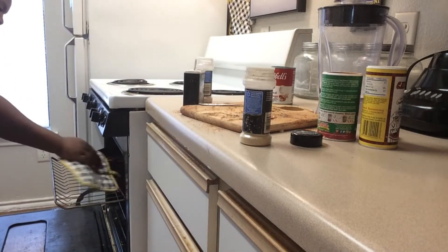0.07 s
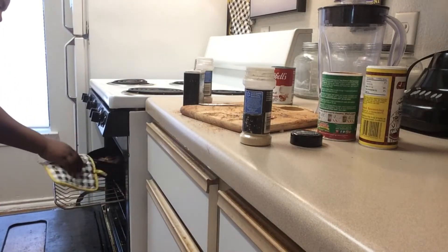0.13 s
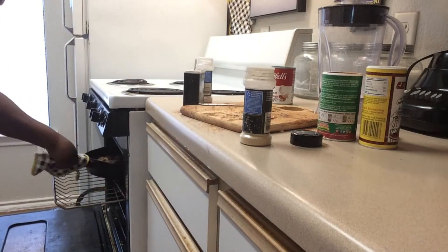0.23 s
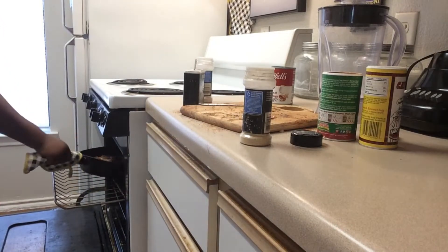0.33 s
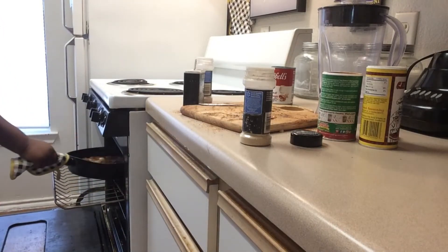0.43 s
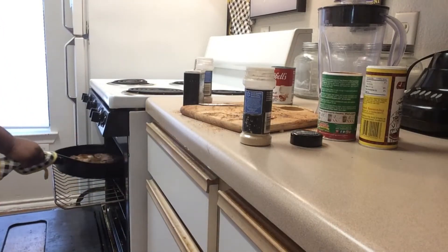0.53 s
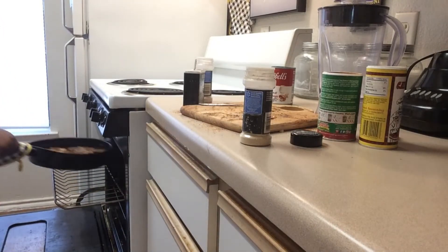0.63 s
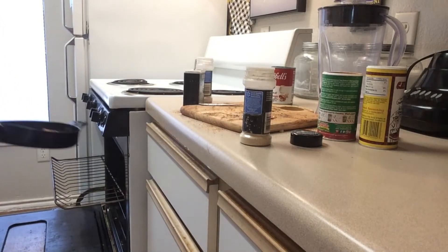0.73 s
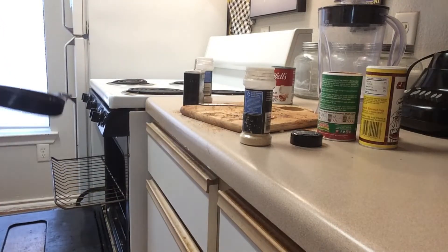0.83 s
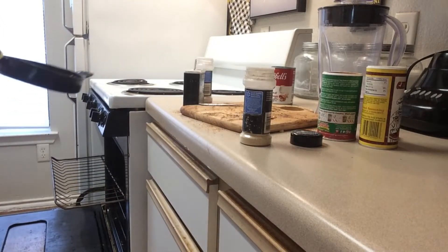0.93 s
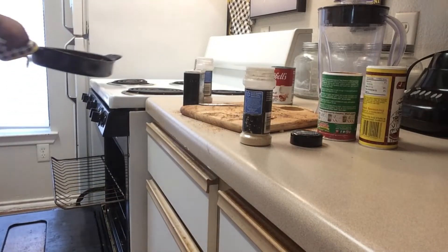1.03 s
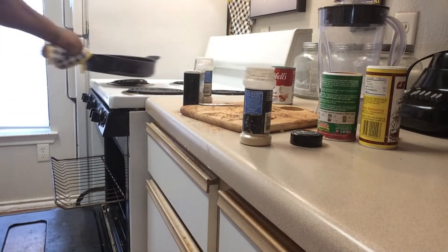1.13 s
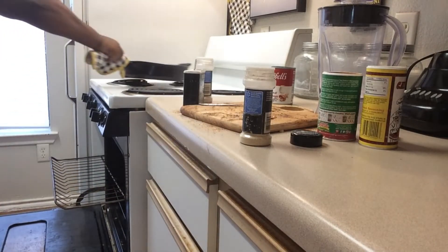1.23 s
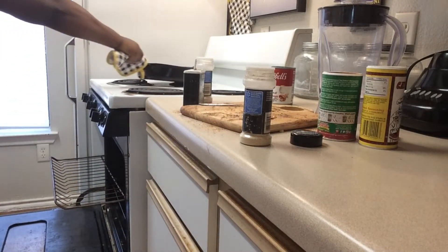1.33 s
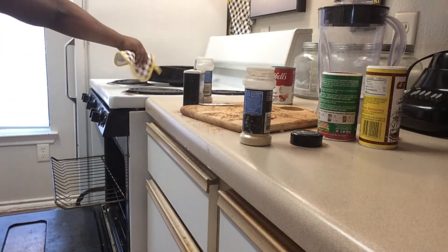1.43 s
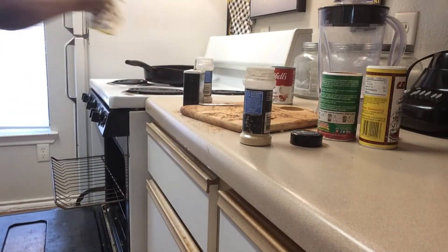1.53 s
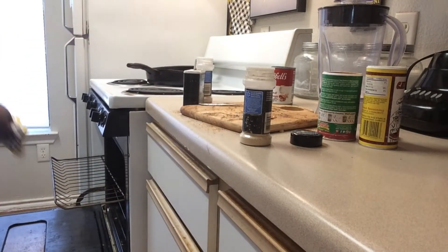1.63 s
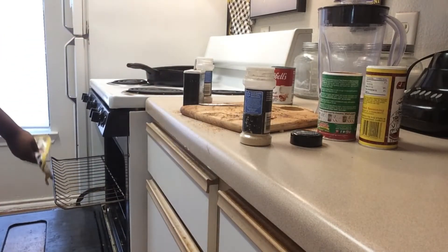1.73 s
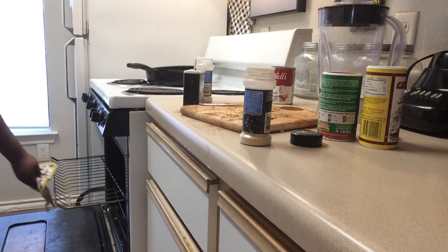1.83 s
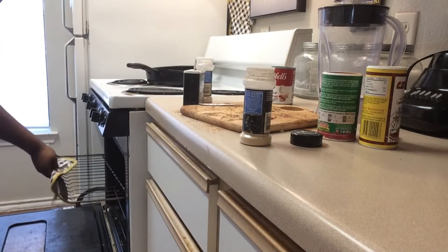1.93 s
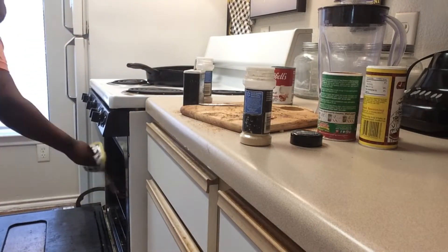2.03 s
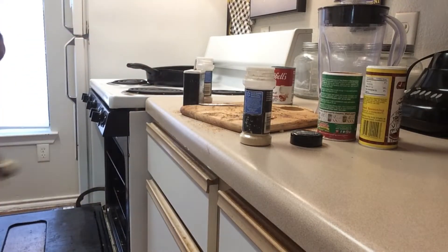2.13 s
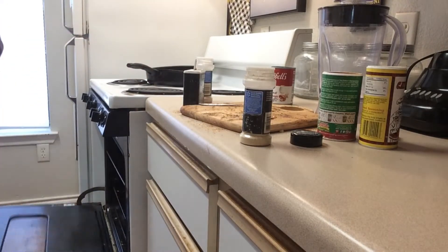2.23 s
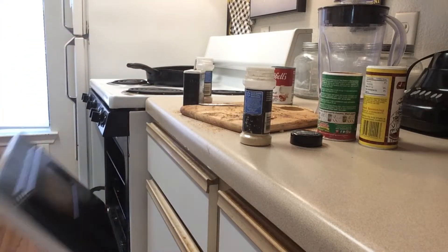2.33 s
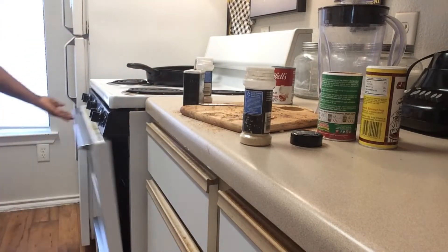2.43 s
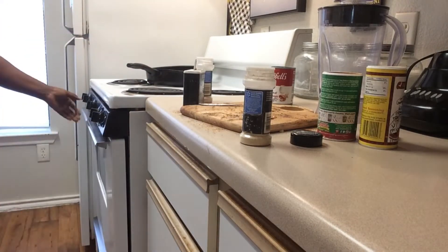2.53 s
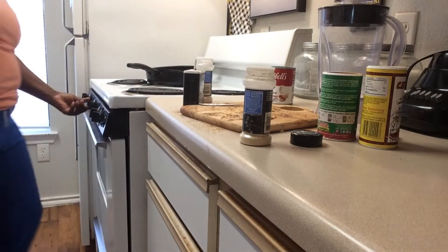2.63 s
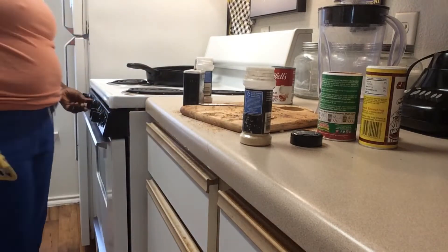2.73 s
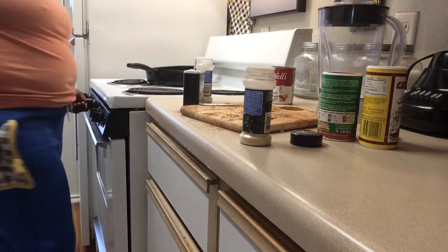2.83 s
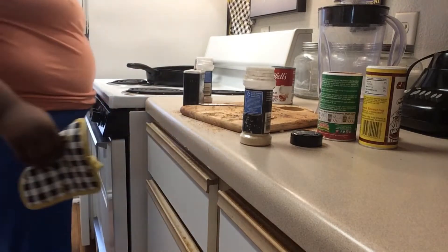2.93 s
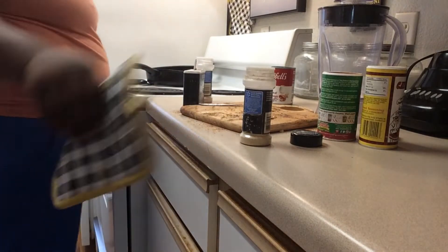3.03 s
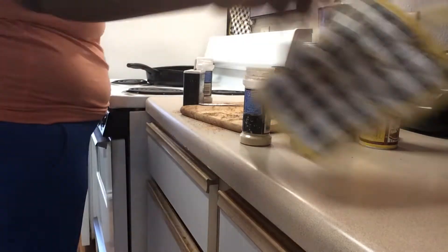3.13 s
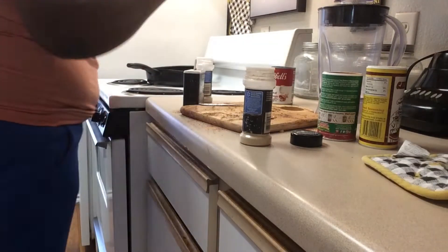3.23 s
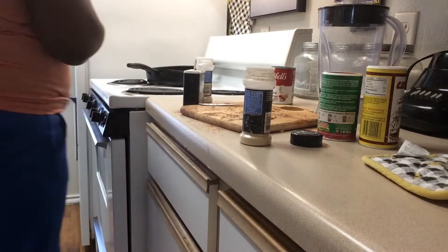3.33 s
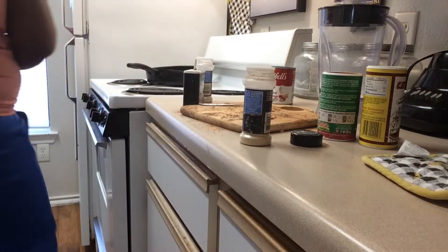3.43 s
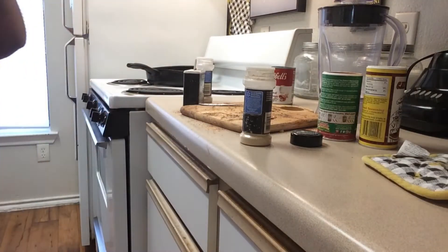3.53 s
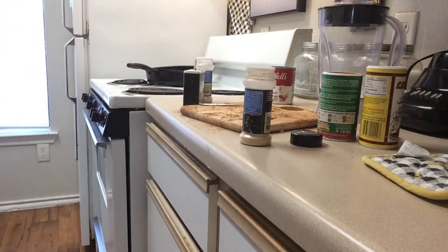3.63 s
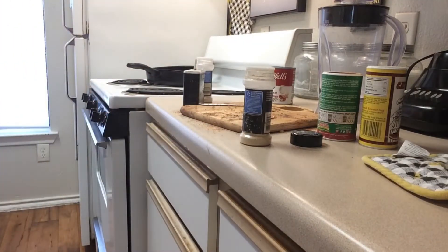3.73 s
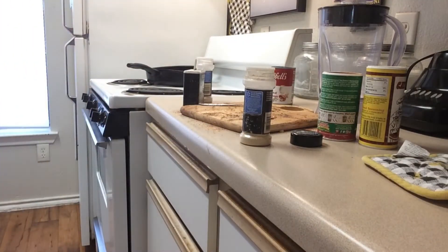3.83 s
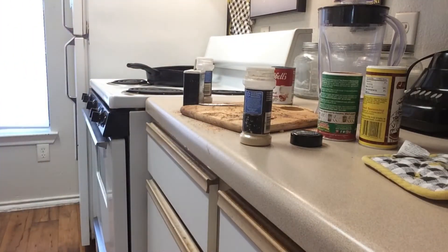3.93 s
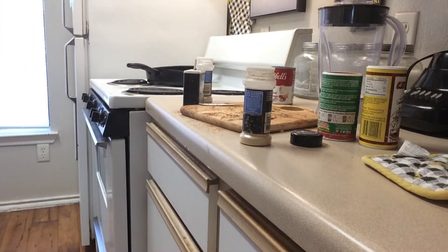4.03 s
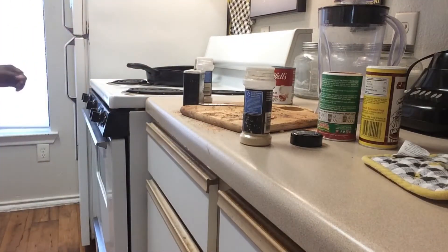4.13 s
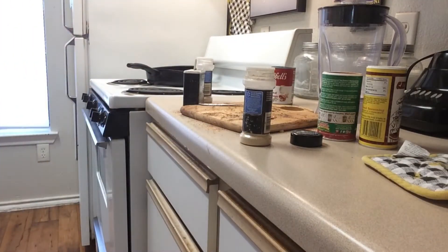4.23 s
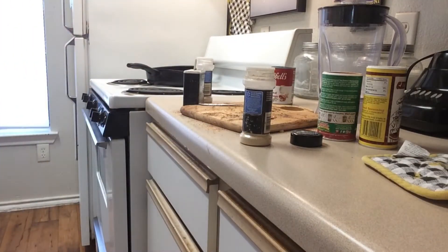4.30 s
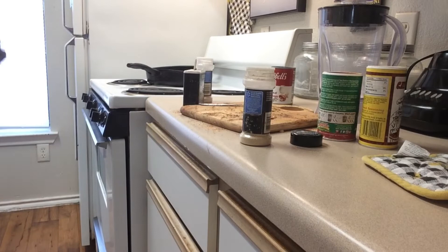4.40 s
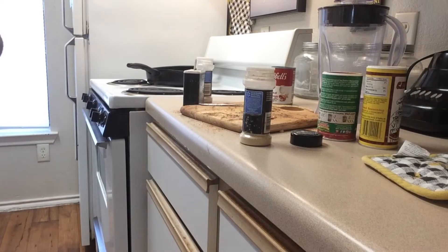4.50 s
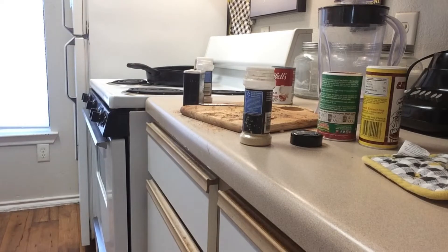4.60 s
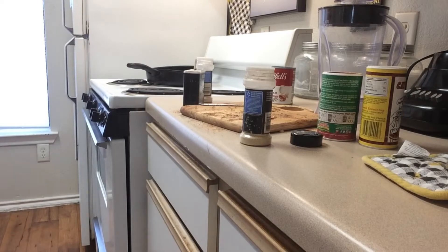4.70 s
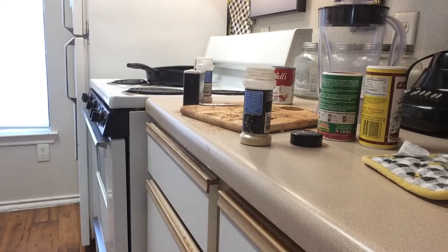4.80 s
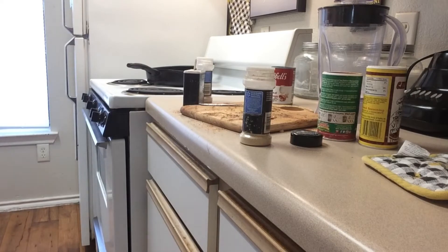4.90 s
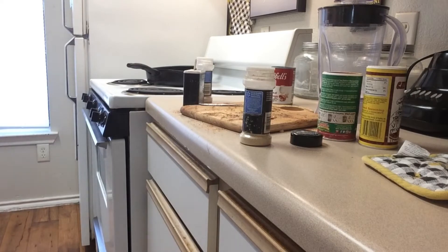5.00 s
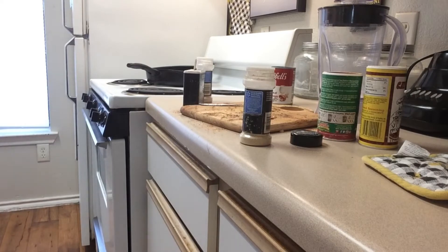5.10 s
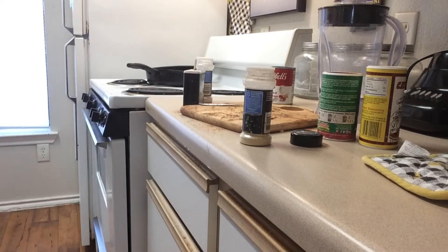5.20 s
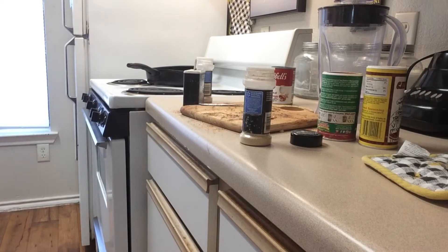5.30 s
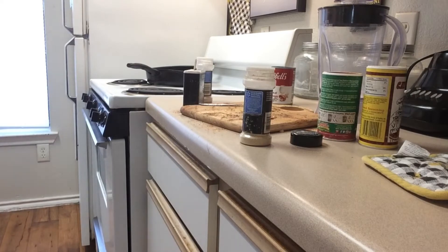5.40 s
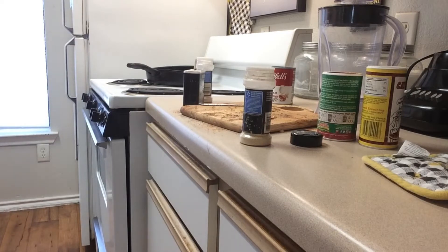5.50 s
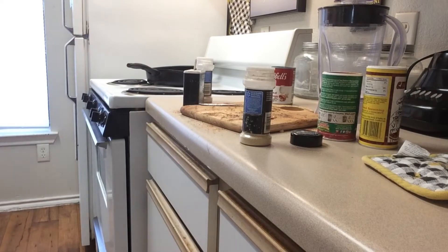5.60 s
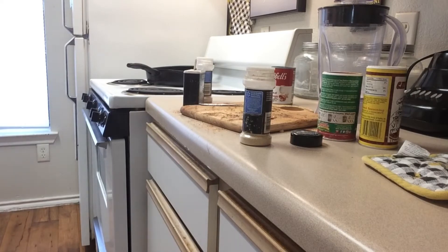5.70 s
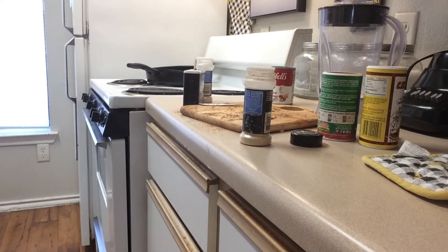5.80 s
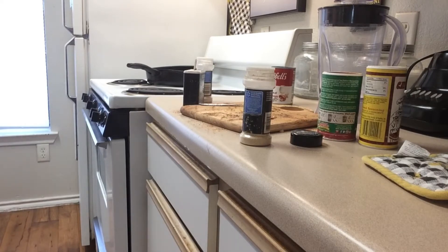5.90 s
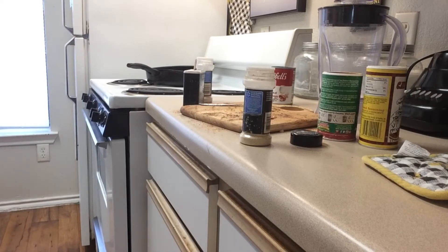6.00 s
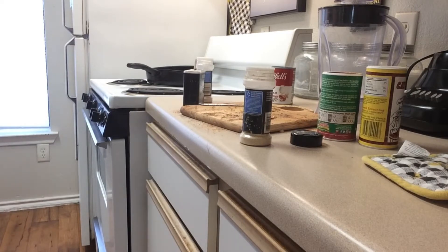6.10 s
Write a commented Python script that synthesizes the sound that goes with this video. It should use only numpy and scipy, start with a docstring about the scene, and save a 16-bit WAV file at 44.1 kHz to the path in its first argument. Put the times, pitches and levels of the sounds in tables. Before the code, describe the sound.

In a small humming kitchen, a heavy iron pan clunks onto a stove, an oven rack and door bang, then a tap hisses.

```python
"""A refrigerator hums in a small kitchen, under faint rustling, light touches and soft thumps.
Then a cast-iron pan is drawn from an oven and set on the hob, the wire rack is shoved home and the door shut:
bursts of random tiny impacts drive ringing panels, and low tones boom. Knobs, cloth and footsteps scuff
lightly afterwards as filtered crackle, and a tap opens across the room as smooth filtered noise.
Most contacts swell for a moment and die away; a few are abrupt ticks."""
import sys
import numpy as np
from scipy import signal
from scipy.fft import rfft, irfft, next_fast_len
from scipy.io import wavfile

SR = 44100
rng = np.random.default_rng(int(sys.argv[2]) if len(sys.argv) > 2 else 0)


def convert_level_to_amplitude(level_db):
    """Map a level in decibels to its linear amplitude factor."""
    exponent = np.asarray(level_db, float) / 20
    return 10 ** exponent


def unload_wav(signal):
    """Save mono or channel-first audio to the path in sys.argv[1] as 16-bit WAV at rate SR, clipped to [-1, 1]."""
    wavfile.write(
        sys.argv[1],
        SR,
        np.round(np.clip(np.atleast_2d(signal).T, -1, 1) * 32767).astype(np.int16),
    )


N = 271215   # length in samples


def rms_one(x):
    """Scale to unit rms."""
    return x / np.sqrt(np.mean(x ** 2) + 1e-24)


def at_hz(points, hz):
    """Read a table between its points on a log-frequency axis."""
    known, value = np.transpose(points)
    return np.interp(np.log(hz), np.log(known), value)


def in_time(rows):
    """Gain along a curve of (time [s], level [dB]), practically silent outside it."""
    s, db = np.transpose(rows)
    return convert_level_to_amplitude(np.interp(np.arange(N) / SR, s, db, left=-150, right=-150))


def coloured(x, spectrum):
    """Give a stream of noise or impacts a spectrum, then scale it to rms 1."""
    hz = np.fft.rfftfreq(N, 1 / SR) + 1
    return rms_one(irfft(rfft(x) * convert_level_to_amplitude(at_hz(spectrum, hz)), N))


def grains(per_s, spread_db):
    """Random tiny impacts of uneven size."""
    unevenness = np.minimum(rng.exponential(1, N), 4)
    sizes = convert_level_to_amplitude(spread_db * unevenness) * rng.standard_normal(N)
    return sizes * (rng.random(N) < per_s / SR)


def drift(rate_hz):
    """A slow random wander around zero, rms 1."""
    r = np.exp(-2 * np.pi * np.clip(rate_hz, .1, 200) / SR)
    noise = rng.standard_normal(N + SR)
    slow = signal.lfilter([1], [1, -2 * r, r * r], noise)[SR:]   # the first second only settles the filter
    return rms_one(slow - slow.mean())


def resonance(x, hz, width_hz):
    """A two-pole band with gain 1 on top."""
    r = np.exp(-np.pi * width_hz / SR)
    top = [(1 - r * r) / 2, 0, (r * r - 1) / 2]
    return signal.lfilter(top, [1, -2 * r * np.cos(2 * np.pi * hz / SR), r * r], x + 1e-18)


def swell_of(db, at_minus_50_s, db_per_db):
    """Swell time of a contact: the louder it is, the longer it takes to swell."""
    return at_minus_50_s * convert_level_to_amplitude(db_per_db * (np.asarray(db) + 50))


def bursts(times, levels_db, swells, fades, lag=0.32, steep=3.65, crest=0.12):
    """Each contact swells along a bell curve, rounds its crest just after the onset and dies away; powers add."""
    power = np.zeros(N)
    swells, fades = np.clip(swells, .001, .08), np.clip(fades, .005, .6)
    for s, db, swell, fade in zip(times, levels_db, swells, fades):
        t = np.arange(-int(2 * swell * SR), int((fade + swell) * SR)) / SR   # zero at the crest
        rising = np.exp(-steep * (t / swell) ** 2)
        past_crest = np.hypot(t, crest * swell) - crest * swell
        shape = np.where(t < 0, rising, convert_level_to_amplitude(-60 * past_crest / fade))
        start = int((s + lag * swell + t[0]) * SR)
        power[start:start + len(t)] += (convert_level_to_amplitude(db) * shape[:N - start]) ** 2
    return np.sqrt(power)


# Low resonances of oven and room: (frequency [Hz], speed of phase wander [Hz], relative level [dB])
LOW_RESONANCES = [(102.4, 15, -5), (129, 7.5, 0.5), (199.7, 9.7, -1), (249.7, 11, -6), (361, 43, -40)]


def boom():
    """The low resonances, each a tone whose phase wanders as fast as its width says; rms 1."""
    t = np.arange(N) / SR
    tones = 0
    for hz, width_hz, db in LOW_RESONANCES:
        phase_wander = 1.62 * drift(width_hz)
        tones = tones + convert_level_to_amplitude(db) * np.sin(2 * np.pi * hz * t + phase_wander)
    return rms_one(tones)


# Blows on the stove's sheet metal:
# (time [s], clang level [dB], thud level [dB], rattle level [dB], clang fade by 60 dB [s])
METAL_BLOWS = [(1.355, -38, -49, -42, 0.09), (1.657, -52.5, -56, -66, 0.049),
               (1.681, -37.5, -39, -66, 0.057), (1.991, -41, -35.5, -45.5, 0.13),
               (2.058, -45, -43, -49.5, 0.18), (2.096, -29.5, -30.5, -32, 0.44),
               (2.136, -29.5, -30, -30.5, 0.22), (2.187, -43.5, -60, -74, 0.18),
               (2.492, -37.5, -39.5, -52, 0.068), (2.539, -34, -36.5, -43, 0.1),
               (2.569, -44.5, -44, -49, 0.035)]
# Pan, rack and door dragging along: (start time [s], end time [s], start level [dB], end level [dB])
DRAGS = [(1.401, 1.527, -52.5, -65.5), (2.187, 2.48, -58.5, -58.5), (2.575, 2.746, -49, -67.5)]
# Ringing panels: (frequency [Hz], relative level [dB], ring length that sets the bandwidth [s])
PANEL_RINGS = [(385, 11.5, 0.092), (720, -10, 0.15), (1030, 5, 0.42), (1020, -17, 0.66), (1240, -26, 0.31),
               (1680, -3.5, 0.08), (2200, -19, 0.55), (2780, 3, 0.21), (3430, -13, 0.26), (3900, -15, 0.22),
               (3840, -12, 0.12), (4570, -27.5, 0.22), (5959, -20, 0.14)]
# Colour of struck metal: (frequency [Hz], relative level per Hz [dB])
CLANG_COLOUR = [(180, -36), (300, 5), (595, -1), (680, 3), (866, -3), (1210, 0.5), (3000, -17.5),
                (3900, -57), (6600, -120)]
# Colour of loose metal: (frequency [Hz], relative level per Hz [dB])
RATTLE_COLOUR = [(1290, -5), (2200, 4), (2470, -1.5), (2720, 3.5), (6590, -8), (12000, -22), (15600, -34)]


def stove():
    """Loose metal chatters at blows and while parts drag; panels ring on briefly and the cavity booms."""
    s, clang_db, thud_db, rattle_db, fade = np.transpose(METAL_BLOWS)
    swell = swell_of(clang_db, 0.019, 0.11)
    chatter = grains(per_s=18000., spread_db=0.55) * convert_level_to_amplitude(2.2 * drift(52.0))   # loose wires knock unevenly
    blows = bursts(s, clang_db, swell, fade)
    clang = coloured(chatter, CLANG_COLOUR) * blows

    drag = sum(in_time([(start, db), (end, end_db)]) for start, end, db, end_db in DRAGS)
    dull = rms_one(resonance(resonance(chatter, 440.0, 740.0), 460.0, 1960.0))   # dragging is duller than a blow
    scrape = dull * drag

    force = rms_one(chatter) * blows + scrape
    rings = 0
    for hz, db, length_s in PANEL_RINGS:
        width_hz = 3.8 / min(length_s, .4)   # short rings are wide
        rings = rings + convert_level_to_amplitude(db - 1) * resonance(force, hz, width_hz)

    rattle = coloured(chatter, RATTLE_COLOUR) * bursts(s, rattle_db, swell, 0.77 * fade)
    thud_strength = np.hypot(bursts(s, thud_db, 1.3 * swell, 0.62 * fade), convert_level_to_amplitude(1) * drag)
    return clang + scrape + rings + rattle + boom() * thud_strength


# Brief narrow rings of struck metal, rack wire, door spring, knob and crockery:
# (time [s], crest level [dB], pitch [Hz], width of the first filter [Hz], fade by 60 dB [s])
NARROW_RINGS = [(0.121, -67, 3850, 600, 0.11), (0.184, -64, 2150, 150, 0.12), (.345, -67.5, 2540, 120, .12),
                (1.359, -39, 704, 150, 0.049), (1.684, -64, 1220, 200, .06), (1.684, -40, 1610, 199, 0.036),
                (2.101, -30.5, 1104, 120, 0.35), (2.245, -50, 732, 100, 0.12),
                (2.41, -66, 6000, 400, 0.052), (2.605, -55, 3900, 500, 0.16), (2.64, -63, 3940, 397, 0.088),
                (2.745, -44.5, 3100, 900, 0.022), (2.873, -60.5, 3000, 500, 0.036),
                (3.041, -54.5, 1060, 480, 0.096), (3.28, -59, 990, 900, 0.025),
                (3.331, -66.5, 3770, 300, .04), (3.634, -44.5, 3170, 900, 0.038),
                (4.684, -53, 2300, 895, 0.036), (4.883, -48, 3300, 704, 0.054),
                (5.238, -59.5, 1090, 600, 0.16), (6.036, -49.5, 2770, 500, 0.04)]


def pings():
    """A blow, friction or a light tap excites one narrow resonance."""
    out = np.zeros(N)
    for s, db, hz, width_hz, fade in NARROW_RINGS:
        narrow = resonance(rng.standard_normal(N), hz, width_hz)
        band = resonance(narrow, hz, 1.5 * width_hz)
        out += rms_one(band) * bursts([s], [db], [swell_of(db, 0.0083, 0.11)], [fade])
    return out


# Light touches of hand, knob, cloth and foot, and the scuff and hiss of the metal blows:
# (time [s], scuff level [dB], hiss level [dB], knock level [dB], scuff fade by 60 dB [s])
SCUFFS = [(0.1183, -82, -72.5, -67, 0.32), (0.1843, -73.5, -75, -59.5, 0.32),
          (0.3254, -68.5, -65, -73, 0.13), (0.48, -72, -78, -61.5, 0.4), (0.5314, -76, -80, -64, 0.17),
          (0.6054, -90, -74, -75, 0.086), (0.756, -69.5, -72, -67, 0.17), (0.811, -77, -74.5, -72, 0.26),
          (1.0074, -75, -79, -77, 0.24), (1.355, -52, -47.5, -40.5, 0.13), (1.6807, -43.5, -50, -46, 0.06),
          (1.8144, -79, -71, -67, 0.14), (1.9916, -47.5, -66, -47, 0.099), (2.41, -69, -73, -62, 0.07),
          (2.539, -42.5, -48, -37, 0.14), (2.609, -59.5, -64, -54, 0.17), (2.702, -84, -64, -52.5, 0.12),
          (2.7434, -46.5, -48.5, -53, 0.065), (2.802, -82, -74, -56, 0.047),
          (3.0433, -63.5, -82, -53.5, 0.091), (3.1824, -73, -68.5, -76, 0.37),
          (3.3862, -72, -72.5, -71, 0.27), (3.484, -66.5, -68, -67, 0.24), (3.5174, -68, -71, -66, 0.09),
          (3.6325, -49.5, -50, -63, 0.13), (3.6894, -63.5, -68.5, -78.5, 0.3),
          (3.8396, -59, -62.5, -68, 0.13), (3.954, -68.5, -69, -71, 0.19),
          (4.0886, -77.5, -74.5, -77, 0.052), (4.1354, -71, -70.5, -79, 0.24),
          (4.1854, -67, -61, -64.5, 0.085), (4.2028, -59, -59, -69, 0.11),
          (4.4263, -62.5, -68.5, -68, 0.27), (4.684, -60.5, -60.5, -55, 0.17),
          (4.7894, -73.5, -72.5, -71, 0.1), (4.8782, -47, -53, -68, 0.12), (4.954, -60.5, -55.5, -65, 0.24),
          (5.002, -56.5, -49.5, -62.5, 0.15), (5.3094, -57, -52.5, -77, 0.08),
          (6.038, -54.5, -51.5, -68, 0.3)]
# Abrupt ticks of latch, knob and fingernail:
# (time [s], scuff level [dB], hiss level [dB], knock level [dB], scuff fade by 60 dB [s])
ABRUPT_TICKS = [(1.947, -71, -78, -58, .08), (2.873, -70, -64.5, -58, 0.05),
                (2.953, -61.5, -63.5, -63, 0.18), (3.2125, -69, -61, -59.5, 0.082),
                (3.2817, -62.5, -71, -49, 0.025), (3.3223, -70, -70.5, -82, 0.07),
                (3.429, -67.5, -59, -79, 0.12), (4.049, -80, -67, -74.5, 0.044)]
# Colour of the scratchy middle: (frequency [Hz], relative level per Hz [dB])
SCUFF_COLOUR = [(710, -13), (1200, -6.5), (1980, -0.5), (2190, 1), (3510, 4), (4340, -0.5), (6500, -12.5),
                (8450, -15.5), (14300, -120)]
# Colour of the hiss above: (frequency [Hz], relative level per Hz [dB])
HISS_COLOUR = [(2650, -74), (4500, 0.5), (5540, 6), (9170, 9.5), (12900, 2.5), (15600, -6.5)]
# Colour of the wooden knock below: (frequency [Hz], relative level per Hz [dB])
KNOCK_COLOUR = [(290, -24), (500, 9.5), (1020, 1), (1730, -4), (2170, -47), (2400, 0), (3120, -27),
                (5280, -120)]


def scuffs_and_ticks():
    """Light touches, and the scuff and hiss of the metal blows: scratchy middle, hiss above, wooden knock below."""
    s, scuff_db, hiss_db, knock_db, fade = np.transpose(SCUFFS + ABRUPT_TICKS)
    swell = swell_of(np.maximum(scuff_db, hiss_db), 0.022, 0.16)
    swell[len(SCUFFS):] = 0.0042   # ticks all swell equally fast, in seconds
    scratch = grains(per_s=17000.0, spread_db=-0.7)
    scuff = coloured(scratch, SCUFF_COLOUR) * bursts(s, scuff_db, swell, fade)
    hiss = coloured(scratch, HISS_COLOUR) * bursts(s, hiss_db, swell, 0.93 * fade)
    knock = coloured(scratch, KNOCK_COLOUR) * bursts(s, knock_db, swell, 0.37 * fade)
    return scuff + hiss + knock


# Dull thumps through oven, floor and cupboards:
# (time [s], boom level [dB], pitch [Hz], knock level [dB], boom fade by 60 dB [s])
DULL_THUMPS = [(0.122, -48, 139, -69, 0.37), (0.176, -51, 129, -50, 0.37), (0.281, -49.5, 129, -61, 0.35),
               (1.356, -40, 155, -45.5, 0.11), (1.682, -38, 328, -37, 0.093),
               (2.099, -26.5, 129.4, -39.5, 0.23), (2.389, -36, 150, -59, 0.1),
               (2.412, -41.5, 195, -45.5, 0.15), (2.492, -35.5, 156, -35.5, 0.11),
               (3.282, -38.5, 165.4, -37.5, 0.038), (3.633, -53, 363, -49.5, 0.072),
               (4.951, -44.5, 248, -51.5, 0.039), (5.001, -50, 205, -48, 0.16),
               (5.794, -44.5, 141.5, -46, 0.19), (5.811, -44.5, 114, -40, 0.15)]
# Colour of the knock on top: (frequency [Hz], relative level per Hz [dB])
WOOD_COLOUR = [(150, -12), (250, 6), (434, -5.5), (1180, -19), (2060, -32.5), (3000, -37), (3900, -69),
               (6600, -120)]


def thumps():
    """Soft heavy contacts: one low resonance answers, with a shorter wooden knock on top."""
    s, boom_db, hz, knock_db, fade = np.transpose(DULL_THUMPS)
    swell = swell_of(boom_db, 0.013, .03) * (fade / 0.13) ** .6   # thumps that fade fast also start faster
    out = coloured(rng.standard_normal(N), WOOD_COLOUR) * bursts(s, knock_db, 0.33 * swell, .5 * fade)
    t = np.arange(N) / SR
    for at, db, pitch_hz, rise, fall in zip(s, boom_db, hz, swell, fade):
        out += np.sin(2 * np.pi * pitch_hz * (t - at)) * bursts([at], [db], [rise], [fall])
    return out


# Colour of the water: (frequency [Hz], relative level per Hz [dB])
WATER_COLOUR = [(530, -12), (900, -12.5), (1050, -6.5), (1140, -14), (1260, -9), (1650, -11.5),
                (2310, -4.5), (3860, -2.5), (4400, -2.5), (6290, 0.5), (8370, 2), (12100, -1.5),
                (15600, -11)]
# The stream weakens briefly: (time [s], depth [dB], half length of the dip [s])
WEAK_MOMENTS = [(5.27, 3.5, 0.047), (6.072, 11, 0.037)]


def tap():
    """Aerated water hisses smoothly into the sink, the stream fluttering a little."""
    opens_s, opening_s, trickle_db, full_db = 4.95, 0.051, -68, -51
    t = np.arange(N) / SR
    flow = in_time([(opens_s, trickle_db), (opens_s + opening_s, full_db), (N / SR, full_db)])
    dips_db = sum(db * np.exp(-((t - s) / half) ** 2) for s, db, half in WEAK_MOMENTS)
    flutter_db = 0.9 * drift(21.0)
    return coloured(rng.standard_normal(N), WATER_COLOUR) * flow * convert_level_to_amplitude(flutter_db - dips_db)


# Cloth and movement near the stove: (time [s], level [dB])
RUSTLE_LEVEL = [(0.0, -70.5), (0.38, -69.5), (0.56, -74.5), (1.38, -73.5), (2.15, -74.5), (2.3, -88),
                (2.49, -69), (2.83, -65), (3.0, -76.5), (3.4, -75), (4.94, -74)]


def rustle():
    """Cloth and small movements: a faint uneven crackle."""
    colour = [(300, -19.5), (900, 0), (3000, -12), (13000, -22.5), (16000, -27)]   # (Hz, dB per Hz)
    strength = in_time(RUSTLE_LEVEL) * convert_level_to_amplitude(1.6 * drift(6.7))
    return coloured(grains(per_s=8000.0, spread_db=0.5), colour) * strength


# Compressor tones: (frequency [Hz], middle rms level [dB])
COMPRESSOR_TONES = [(129.2, -66.5), (188.4, -67.5), (236.9, -72.5), (301.5, -82.5), (360.7, -75.5),
                    (581.4, -78)]
# Colour of fan and air: (frequency [Hz], relative level per Hz [dB])
AIR_COLOUR = [(15, -74), (38, -8.5), (75, -8.5), (122, -1), (193, -1), (282, -5), (369, -3), (422, -4.5),
              (583, -12.5), (650, -13), (1050, -21), (2180, -32.5), (11300, -36), (14000, -44),
              (15600, -75)]


def refrigerator():
    """Compressor tones waver in phase and strength over a nearly steady rush of fan and air."""
    t = np.arange(N) / SR
    tones = 0
    for hz, db in COMPRESSOR_TONES:
        strength = convert_level_to_amplitude(db + 3.4 * drift(18.0))
        tones = tones + strength * np.sin(2 * np.pi * hz * t + 0.53 * drift(6.0))
    air = convert_level_to_amplitude(-62 + 0.75 * drift(19.0)) * coloured(rng.standard_normal(N), AIR_COLOUR)
    return np.sqrt(2) * tones + air   # the root turns rms levels into sine peaks


# Reverberation of the room: (frequency [Hz], time to fade by 60 dB [s])
ROOM_FADE = [(150, 0.23), (1000, 0.22), (4000, 0.14), (12000, 0.14)]


def kitchen(x):
    """Ten feedback delays whose loss follows the reverberation time at each pitch."""
    size = next_fast_len(N + SR)
    hz = np.fft.rfftfreq(size, 1 / SR) + 1
    fade_s = np.clip(at_hz(ROOM_FADE, hz), .03, 1)
    echoes = 0
    for k, lag_s in enumerate(rng.uniform(.008, .03, 10)):
        loop = convert_level_to_amplitude(-60 * lag_s / fade_s) * np.exp(-2j * np.pi * hz * lag_s)
        echoes = echoes + (-1) ** k * loop / (1 - loop)
    return irfft(rfft(x, size) * echoes, size)[:N]


def scene():
    """A low cut keeps deep bass out of the contacts, which share the room echo; the rest is added directly."""
    contacts = stove() + pings() + scuffs_and_ticks() + thumps()
    low_cut = signal.butter(4, 73, "high", fs=SR, output="sos")   # corner in Hz
    contacts = signal.sosfilt(low_cut, contacts)
    echo = convert_level_to_amplitude(-21.5) * kitchen(contacts)
    return (contacts + echo + tap() + rustle() + refrigerator())[None]


def roll_off(x):
    """The treble ends steeply here."""
    return signal.sosfilt(signal.butter(12, 15720, fs=SR, output="sos"), x)


def record(dry):
    """One microphone that gently rounds the highest peaks."""
    peak_limit = .3   # of full scale
    mix = peak_limit * np.tanh(dry / peak_limit)
    return roll_off(mix)


dry = scene()
out = record(dry)
unload_wav(out)
```